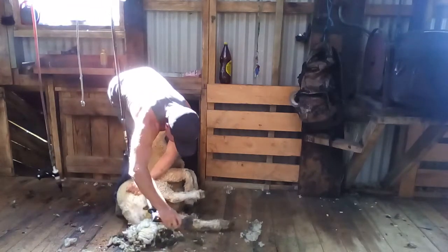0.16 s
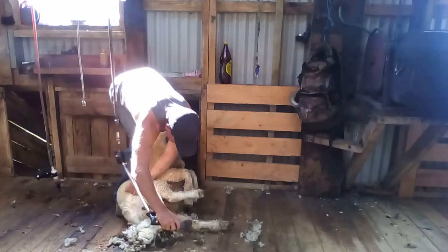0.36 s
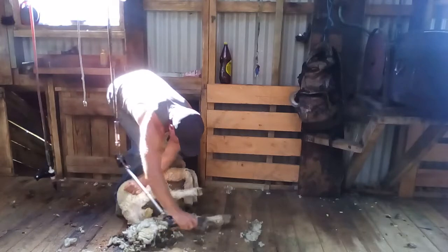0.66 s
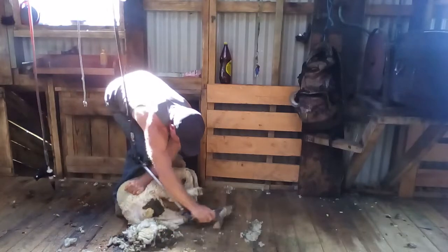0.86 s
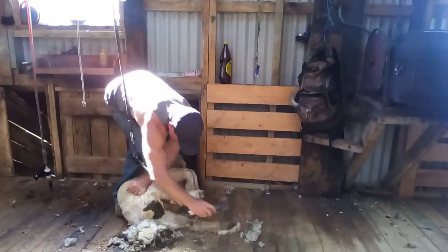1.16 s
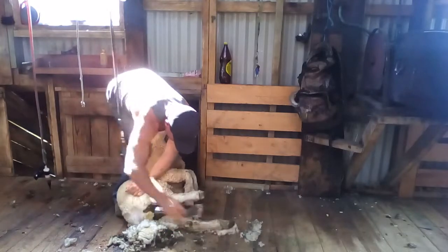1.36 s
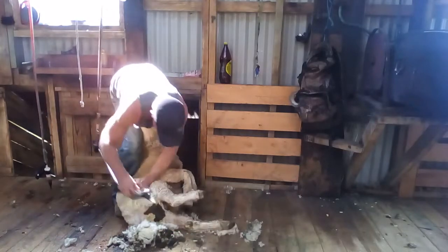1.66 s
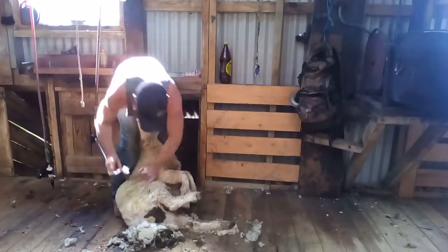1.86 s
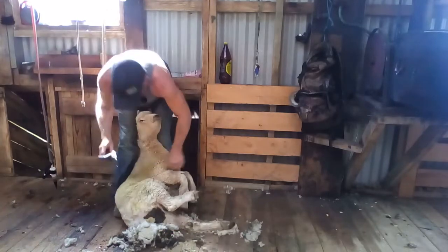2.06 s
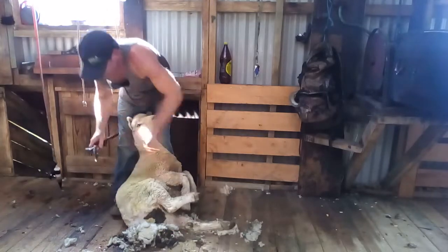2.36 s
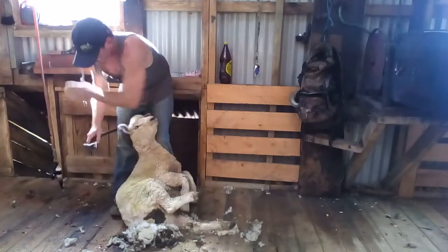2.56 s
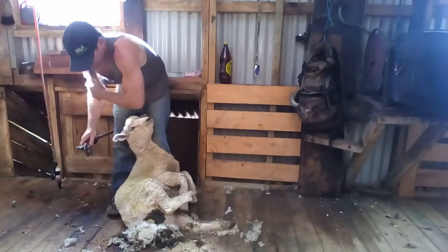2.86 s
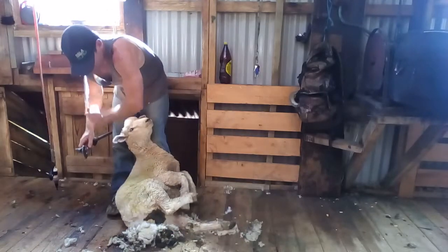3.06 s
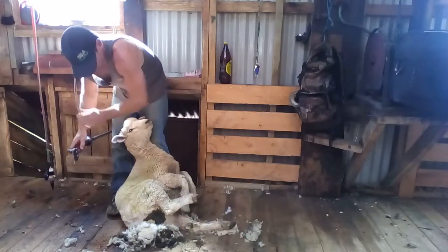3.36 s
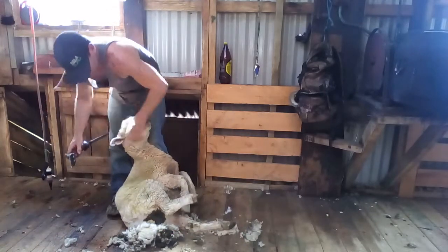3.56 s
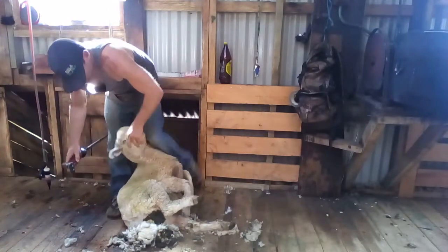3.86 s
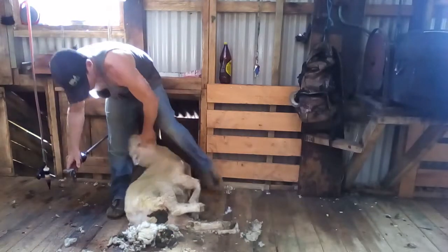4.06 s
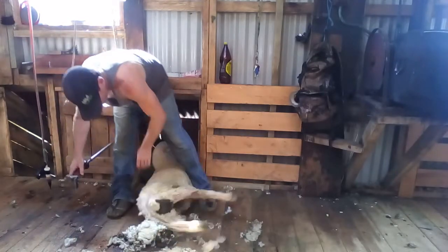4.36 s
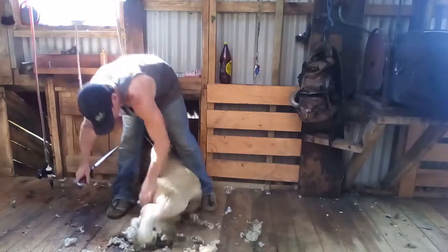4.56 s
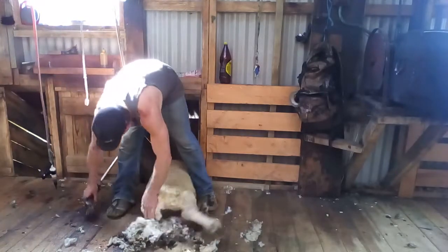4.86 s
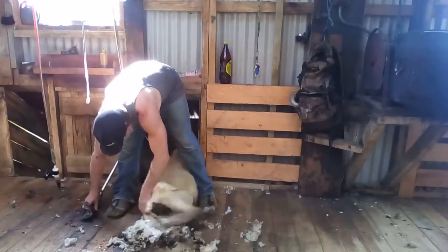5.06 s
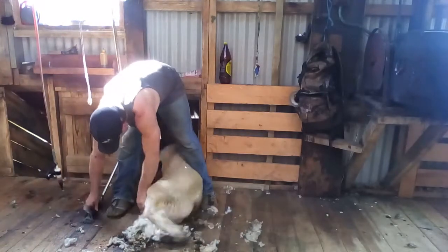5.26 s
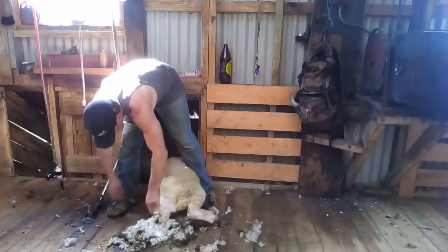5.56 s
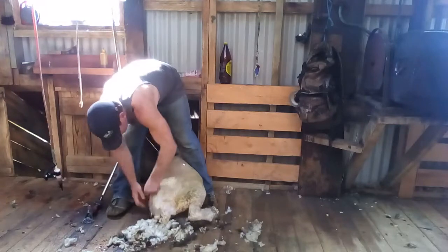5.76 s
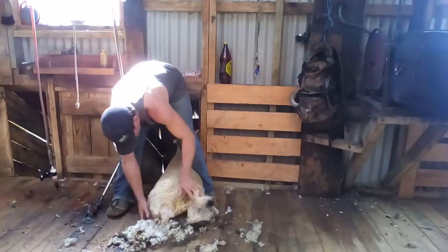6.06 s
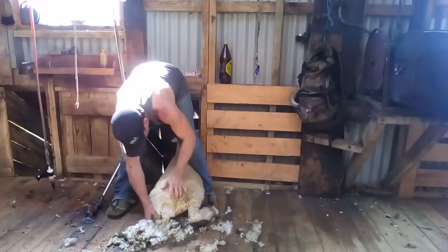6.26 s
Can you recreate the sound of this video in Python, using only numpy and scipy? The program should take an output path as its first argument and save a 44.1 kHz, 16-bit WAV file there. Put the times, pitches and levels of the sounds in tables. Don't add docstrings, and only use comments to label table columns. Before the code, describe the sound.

An electric shearing handpiece buzzes with a raspy metallic rattle, clacks off, is set down on boards, then hooves knock and scrabble on hollow wood.

```python
import sys
import numpy as np
from scipy import signal
from scipy.fft import rfft, irfft, next_fast_len
from scipy.io import wavfile
from scipy.ndimage import uniform_filter1d

SR = 44100
rng = np.random.default_rng(int(sys.argv[2]) if len(sys.argv) > 2 else 0)


def magnitude_from_level(level_db):
    exponent = np.asarray(level_db, float) / 20
    return 10 ** exponent


def log_audio(samples):
    frames = np.atleast_2d(samples).T
    limited = np.clip(frames, -1, 1)
    pcm = np.round(limited * 32767).astype(np.int16)
    wavfile.write(sys.argv[1], SR, pcm)


N = 282681
SECONDS = np.arange(N) / SR
STOP_S = 3.158


def rms_one(x):
    return x / np.sqrt(np.mean(x ** 2) + 1e-20)


def in_time(rows):
    s, *columns = np.transpose(rows)
    return [np.interp(SECONDS, s, c) for c in columns]


def at_hz(points, hz):
    table_hz, values = np.transpose(points)
    return np.interp(np.log(hz), np.log(np.maximum(table_hz, 1)), values)


def high_pass(x, order, hz):
    return signal.sosfilt(signal.butter(order, hz, "high", fs=SR, output="sos"), x)


def band_pass(x, order, low_hz, high_hz):
    return signal.sosfilt(signal.butter(order, [low_hz, high_hz], "band", fs=SR, output="sos"), x)


def drift(rate):
    r = np.exp(-80 * np.pi * rate / SR)
    noise = rng.standard_normal(N // 40 + 2002)
    slow = signal.lfilter([1], [1, -2 * r, r * r], noise)[2000:]
    return np.interp(np.arange(N) / 40, np.arange(len(slow)), rms_one(slow - slow.mean()))


def ring(x, hz, t60):
    r, w = magnitude_from_level(-60 / (t60 * SR)), 2 * np.pi * hz / SR
    return signal.lfilter([0, np.sin(w)], [1, -2 * r * np.cos(w), r * r], x + 1e-18)


# f/Hz, left-right correlation
LIKENESS = [(60, 0.93), (130, 0.99), (290, 0.85), (640, 0.53), (1410, 0.16), (3100, 0.079), (6820, 0.15),
            (15000, 0.0075)]
# f/Hz, left minus right level/dB
LEAN = [(60, 2.5), (110, 2.5), (200, 1.5), (380, -0.5), (700, -1.5), (1290, -0.5), (2380, 5), (4400, 3),
        (8120, -9.5), (15000, 5.5)]
EDGES = 25 * 2 ** np.arange(0, 9.5, .4)


def bands(size):
    white = rng.standard_normal((2, 2, size))
    for k, (low, high) in enumerate(zip(EDGES, EDGES[1:])):
        mid, side = band_pass(white[k % 2], 2, low, high)
        hz = np.sqrt(low * high)
        alike = np.clip(at_hz(LIKENESS, hz), -1, 1)
        lean = at_hz(LEAN, hz) / 2
        pair = np.sqrt(1 + alike) * mid + np.sqrt(1 - alike) * side * [[1], [-1]]
        yield hz, magnitude_from_level(np.array([[lean], [-lean]])) * pair


def coloured(spectrum, patchy_db, span=(0, 7)):
    start, stop = round(span[0] * SR), min(round(span[1] * SR), N)
    flat = sum(magnitude_from_level(patchy_db * drift(9.9)[start:stop]) * band for hz, band in bands(stop - start))
    size = next_fast_len(stop - start)
    hz = np.arange(size // 2 + 1) * SR / size + 1
    shaped = irfft(rfft(flat, size) * magnitude_from_level(at_hz(spectrum, hz)), size)
    out = np.zeros((2, N))
    out[:, start:stop] = rms_one(shaped[:, :stop - start])
    return out


# t/s, seventh order f/Hz, level/dB
DRIVE = [(0.0, 429.4, -17.5), (0.05, 423.9, -18), (0.38, 422.2, -19.5), (0.63, 420.0, -17),
         (1.58, 421.9, -19), (2.05, 422.6, -13), (2.21, 424.7, -22.5), (2.6, 423.4, -20.5),
         (2.74, 423.5, -23.5), (3.12, 422.5, -21)]
# multiple of its speed, level/dB
SHAFT = [(1, -23.5), (2, -15.5), (3, -15), (4, -7), (5, -16.5), (6, -16), (7, 0), (8, -10.5), (9, -22.5),
         (10, -16.5), (11, -14.5), (13, -21), (14, -21), (15, -24.5)]
# t/s, fourth order level/dB
BITE = [(0.0, -24), (0.29, -30.5), (0.42, -32), (0.7, -23.5), (1.55, -28), (2.02, -24), (2.34, -33.5),
        (2.53, -27), (3.12, -33)]
# order, t/s, width/s, level/dB
GRIP = [(2, 0.18, 0.21, 5), (2, 1.54, 0.29, 5), (2, 2.75, 0.36, 5.5), (1, 0.45, 0.27, 11.5),
        (1, 1.78, 0.43, 10.5), (9, 2.45, 0.19, 11), (9, 2.92, 0.27, 12), (10, 1.15, 0.57, 3.5),
        (10, 1.75, 0.23, 6.5), (11, 0.28, 0.25, 5.5), (11, 1.39, 0.22, 3), (14, 0.28, .3, 4.5),
        (14, 2.91, 0.19, 11.5), (15, 0.87, 0.18, 12.5), (15, 2.55, 0.22, 8), (13, 2.5, 0.3, -4),
        (3, 0.446, 0.17, 2.5), (3, 2.53, 0.47, 4)]
# t/s, level/dB
PRESSURE = [(0.0, -28.5), (0.28, -33), (0.99, -30.5), (1.54, -33), (1.66, -29), (1.67, -31.5), (1.89, -32),
            (1.95, -30), (3.14, -31.5)]
# f/Hz, level/dB per Hz
RATTLE = [(30, -8.5), (60, -19), (190, -12.5), (420, -17.5), (560, -16), (1100, -18.5), (2000, -19.5),
          (3000, -17), (3800, -20), (6300, -19), (8000, -32), (12200, -37.5), (13000, -30.5), (15200, -32)]
# f/Hz, bandwidth/Hz, level/dB
COMB = [(4570, 136, -3.5), (4950, 315, 3.5), (5910, 140, -9)]
BITE_SHARE = {2: -0.38, 9: -0.22}


def handpiece():
    seventh_hz, load_db = in_time(DRIVE)
    fourth_db, = in_time(BITE)
    press_db, = in_time(PRESSURE)
    swing_db = load_db - np.mean(np.transpose(DRIVE)[2])
    bite_db = fourth_db - np.mean(np.transpose(BITE)[1])
    press_db = press_db - np.mean(np.transpose(PRESSURE)[1])

    free_s = np.maximum(SECONDS - 2.752, 0)
    throb = 1 - np.sin(np.pi * 8.59 * free_s) ** 2
    seventh_db = load_db + 19.5 * np.minimum(free_s, .5) + 20 * np.log10(throb + 0.00084)

    turn = 2 * np.pi * np.cumsum(seventh_hz / 7) / SR
    running = 1 / (1 + np.exp(np.clip((SECONDS - STOP_S) / 0.0077, -50, 50)))
    hum = np.zeros(N)
    for order, level_db in SHAFT:
        own_db = {7: seventh_db, 4: fourth_db + 1.5}.get(order, level_db - 21 + 1.2 * drift(2.2))
        for which, s, width, db in GRIP:
            if which == order:
                own_db = own_db + db * np.exp(-((SECONDS - s) / width) ** 4)
        own_db = own_db + bite_db * BITE_SHARE.get(order, 0)
        shake = magnitude_from_level(0.23 * min(order, 8.0) * drift(31))
        phase = order * turn + rng.uniform(0, 3.6) + 0.03 * order * drift(12.7)
        hum += np.sqrt(2) * magnitude_from_level(own_db) * shake * np.sin(phase)

    sharp = np.clip(.4 + .2 * drift(4.0), 0, 1)
    sweep = np.exp(1.9 * sharp * (np.cos(2 * turn) + 0.6 * np.cos(turn + 1.9)))
    struck = rng.random((2, N)) < 1500 * sweep / SR
    strength = magnitude_from_level(4.0 * np.minimum(rng.exponential(1, (2, N)), 4))
    clicks = struck * strength * rng.choice([-1, 1], (2, N))
    steel = sum(magnitude_from_level(db) * ring(clicks, hz, 2.4 / width) for hz, width, db in COMB)
    steel = rms_one(band_pass(steel, 4, 3600, 7000))
    comb_db = -26.5 + 1.5 * press_db + .3 * drift(5.0)

    rattle = magnitude_from_level(-21.5 - 0.15 * swing_db) * coloured(RATTLE, patchy_db=1.02, span=(0, 4.3))
    rattle = rattle + magnitude_from_level(comb_db) * steel
    coasting = np.minimum(1, magnitude_from_level(-70 * (SECONDS - STOP_S)))
    return hum * running, rattle * (.55 * coasting + .45 * running)


# f/Hz, level/dB per Hz
HUSH = [(30, -31), (56, -1.5), (127, -9.5), (220, -5.5), (460, -13.5), (585, -7), (730, -14), (1170, -17.5),
        (3300, -20.5), (3800, -24.5), (6500, -25), (7900, -54), (11500, -49), (15000, -62)]


def hush():
    fan_db = -55 + 13 * np.maximum(SECONDS - 5.66, 0)
    fan = rms_one(ring(rng.standard_normal(N), 581, t60=0.38))
    air = coloured(HUSH, patchy_db=0.85)
    side_on = high_pass(np.roll(air[0], 16) - .5 * air[1], 1, 700)
    air = np.stack([air[0], air[1] + .33 * side_on])
    return magnitude_from_level(-39) * air + magnitude_from_level(fan_db) * fan


# f/Hz, T60/s
SHED_T60 = [(60, 1), (250, 0.93), (800, 0.62), (2000, 0.58), (5000, 0.78), (12000, 0.35)]
# f/Hz, level/dB per Hz
SHED_COLOUR = [(60, 3.5), (400, -3.5), (1300, 2.8), (2300, 1.5), (3700, 3.5), (5000, 3.5), (7500, -12),
               (12000, -12)]


def shed(x, early_s=.009):
    age = np.arange(SR) / SR
    echo = sum(magnitude_from_level(at_hz(SHED_COLOUR, hz) - 60 * age / at_hz(SHED_T60, hz)) * band for hz, band in bands(SR))
    echo = echo * (1 - np.exp(-(age / early_s) ** 2))
    return signal.fftconvolve(x[None], echo / np.sqrt(np.sum(echo ** 2) / 2), axes=1)[:, :N]


# f/Hz, T60/s, t/s, width/s, level/dB
BARREL = [
    (2820, 0.0024, 1.28, 0.38, -31),
    (1510, 0.0093, 1.23, 0.26, -35.5),
    (2400, 0.005, 2.5, 0.28, -40),
    (6030, 0.0085, 0.64, 0.096, -27),
    (6020, 0.0031, 1.28, 0.22, -31.5),
]


def barrel():
    out = np.zeros((2, N))
    for hz, t60, s, width, db in BARREL:
        facing = np.exp(-((SECONDS - s) / width) ** 4) * (SECONDS < STOP_S)
        rung = ring(ring(rng.standard_normal((2, N)), hz, t60), hz, t60)
        out += magnitude_from_level(db) * facing * rms_one(rung)
    return out


# t/s, length/s, level/dB
SHADED = [
    (1.47, 0.36, -8),
    (2.474, 0.12, -3.5),
    (2.77, 0.082, -2.5),
    (3.054, 0.53, -10),
]


def shaded(x):
    shade_db = 0
    for s, length, db in SHADED:
        inside_s = np.minimum(SECONDS - s, s + length - SECONDS)
        shade_db = shade_db + db * np.clip(inside_s / .03 + .5, 0, 1)
    top = signal.sosfiltfilt(signal.butter(2, 11600, "high", fs=SR, output="sos"), x)
    return x - (1 - magnitude_from_level(shade_db)) * top


# t/s, peak level/dB, f/Hz, T60/s
SQUEAKS = [
    (1.864, -23, 13200, .065),
    (5.352, -61, 13200, .2),
]


def squeaks():
    out = np.zeros((2, N))
    for s, db, hz, t60 in SQUEAKS:
        rasp = ring(ring(rng.standard_normal((2, N)), hz, t60=0.0092), hz, t60=.003)
        fade = magnitude_from_level(db - 60 * np.maximum(SECONDS - s, 0) / t60) * (SECONDS > s)
        out += fade * rms_one(rasp)
    return out


def blows(events, modes):
    give_cycles, far_cycles = 2.5, 8
    age = np.arange(12000) / SR
    contact_s = np.clip(np.transpose(events)[2], 2e-4, 1)[:, None]
    chatter = rng.standard_normal((len(events), len(age)))
    chatter = chatter * np.exp(-(age / contact_s) ** 4) * np.minimum(1, .1 + 2.5 * age / contact_s)
    chatter[:, 0] = 5
    out = np.zeros((2, N))
    for hz, level_db, t60 in modes:
        soft = ring(np.vstack([chatter, age == 0]), hz, give_cycles / hz)
        rung = ring(soft[:-1], hz, t60)
        rung = rung / np.max(np.abs(rung), axis=1, keepdims=True)
        clean = rms_one(ring(soft[-1], hz, min(t60, far_cycles / hz)))
        octaves = np.log2(hz / modes[2][0])
        for row, (s, peak_db, _, hard_db) in enumerate(events):
            both = np.stack([rung[row], clean * np.std(rung[row])])
            out[:, round(s * SR):][:, :len(age)] += magnitude_from_level(peak_db + level_db + hard_db * octaves) * both
    return out


# t/s, peak level/dB, contact/s, hardness/dB per octave
CLUTCH = [
    (3.1655, -6, 0.0048, -0.5),
    (3.175, -28, 0.0058, 1),
    (3.193, -17, 0.0011, -1),
]
# f/Hz, level/dB, T60/s
LEVER = [(294, -26, 0.024), (544, -32, 0.082), (712, -20, 0.1), (840, -0.5, 0.057), (1063, -2.5, 0.024),
         (1290, -0.5, 0.015), (1594, 3, 0.019), (1980, -4, .015), (2330, -10.5, 0.071), (2840, -32, 0.015),
         (4160, -12, .015), (5900, -9.5, 0.0098)]


def clutch():
    return blows(CLUTCH, LEVER)


# t/s, peak level/dB, low f/Hz, high f/Hz
TICKS = [(3.1665, -20, 1200, 7000), (3.466, -44, 3000, 11000), (3.4885, -27, 1500, 7000),
         (4.7035, -26, 1800, 6500), (4.716, -31, 1500, 3000), (4.8505, -16.5, 1000, 2100),
         (5.2975, -42, 1500, 6000), (5.3012, -31, 4800, 12000), (5.306, -26, 1000, 2000),
         (5.317, -52, 7500, 11000), (5.394, -21.5, 450, 900), (5.576, -27, 1000, 1800),
         (5.686, -31, 900, 2000)]


def ticks():
    out = np.zeros(N)
    for s, db, low_hz, high_hz in TICKS:
        click = band_pass(np.arange(800) == 0, 2, low_hz, high_hz)
        out[round(s * SR):][:len(click)] += magnitude_from_level(db) * click / np.max(np.abs(click))
    return out


# t/s, peak level/dB, contact/s, hardness/dB per octave
LAID = [
    (3.462, -53, 0.0082, 12.5),
    (3.487, -10, 0.012, 1.5),
    (3.513, -30, 0.0045, 0),
]
# f/Hz, level/dB, T60/s
TOOL = [(253, -33, .03), (493, -38, .025), (756, -32, .03), (908, 1, 0.046), (1157, -1.5, 0.036),
        (1416, -4.5, 0.018), (1724, -2.5, 0.037), (2150, -13.5, 0.013), (3380, -19.5, 0.011),
        (4190, -16, 0.014), (5300, -22.5, .005), (5760, -14.5, .01), (6050, -24, 0.0044), (9900, -24, .003)]


def tool_laid_down():
    return blows(LAID, TOOL)


# t/s, length/s, level/dB
SCUFF = [
    (4.656, 0.04, -35),
    (5.33, 0.036, -27),
    (5.418, 0.033, -22.5),
    (5.453, 0.083, -23.5),
    (5.533, 0.043, -28),
    (5.67, .01, -39),
]
# f/Hz, level/dB per Hz
SCUFF_COLOUR = [(41, -23), (70, -9.5), (332, -3), (387, -10), (466, -12.5), (788, -13.5), (982, -15),
                (2210, -33.5), (3050, -32.5), (4000, -48), (5200, -71), (8800, -120)]


def scuffing():
    slides = []
    for s, length, db in SCUFF:
        before_s = np.maximum(s - SECONDS, 0)
        after_s = np.maximum(SECONDS - s - length, 0)
        slides.append(db - 496 * before_s - 320 * after_s)
    level_db = np.max(slides, axis=0) - 3 + 2.5 * drift(40)
    return magnitude_from_level(level_db) * coloured(SCUFF_COLOUR, patchy_db=3.0, span=(4.4, 6))


# t/s, peak level/dB, contact/s, hardness/dB per octave
KNOCKS = [(4.657, -34.5, 0.03, 5), (4.7028, -9.5, 0.005, 2), (4.713, -18.5, 0.0051, 3.5),
          (4.8495, -13, 0.0036, 4.5), (4.856, -16, 0.0092, -6.5), (4.878, -15, 0.0041, -6),
          (4.796, -20.5, 0.0051, -7), (5.089, -47, 0.0051, -11), (5.418, -33.5, .03, 2),
          (5.47, -28, .03, 0.5), (5.515, -30, 0.0072, 0), (5.655, -34, .004, -1)]
# f/Hz, level/dB, T60/s
BOARDS = [(257, -14, 0.059), (460, -2.5, 0.008), (607, 1.5, 0.017), (858, -17, .015), (1073, -5.5, 0.018),
          (1353, -4.5, 0.012), (1636, -9, 0.015), (2100, -19, .006), (2480, -21, 0.0064),
          (3250, -37, 0.0028), (4450, -41, .003)]


def knocks():
    return blows(KNOCKS, BOARDS)


# t/s, peak level/dB, contact/s, hardness/dB per octave
THUDS = [
    (4.713, -6, 0.0057, 2.5),
    (4.748, -14, 0.0045, 4),
    (5.02, -31.5, 0.023, -5),
    (4.852, -12.5, 0.017, 11),
    (5.305, -15.5, 0.018, 11),
    (5.51, -24, 0.018, -2),
    (5.55, -23, 0.023, -5),
]
# f/Hz, level/dB, T60/s
JOISTS = [(89, -7.5, 0.12), (135.3, -5, 0.26), (192.7, -14, 0.27), (263, -13, 0.21)]


def thuds():
    return blows(THUDS, JOISTS)


# t/s, peak level/dB, contact/s, hardness/dB per octave
HOOVES = [(5.341, -12.5, 0.0007, 1.5), (5.37, -19.5, 0.012, -8), (5.3925, -11.5, 0.00074, 4),
          (5.402, -15.5, 0.0071, -3), (5.42, -11.5, 0.015, 6), (5.443, -24, 0.0044, 9),
          (5.462, -20, 0.014, 2), (5.49, -28, 0.0074, 5), (5.506, -21, 0.013, -7), (5.546, -25, 0.015, -2)]
# f/Hz, level/dB, T60/s
HOLLOW = [(197, -31, 0.044), (320, -0.5, 0.023), (424, -1.5, 0.021), (610, -30, .02), (1000, -31, .015),
          (1500, -30.5, 0.019)]


def hooves():
    return blows(HOOVES, HOLLOW)


WET_DB = [-1, -1.5, -7, -8, -8.5]


def scene():
    hum, rattle = handpiece()
    struck = [clutch(), tool_laid_down(), knocks(), hooves(), thuds()]
    edges = ticks()
    far = magnitude_from_level(-9.5) * edges + sum(magnitude_from_level(db) * body[1] for db, body in zip(WET_DB, struck))
    wet = shed(magnitude_from_level(-15) * hum + high_pass(far, 3, 98))
    near = high_pass(sum(body[0] for body in struck), 3, 68)
    return hum + edges + near + wet + shaded(rattle) + squeaks() + scuffing() + hush() + barrel()


def low_pass(x):
    return signal.sosfilt(signal.butter(12, 15400, fs=SR, output="sos"), x)


def record(dry):
    x = np.stack([dry[0], np.roll(dry[1], 2)])
    x = np.tanh(high_pass(x, 2, 45) / 1.308) * 1.065
    to_sum_and_difference = np.array([[1, 1.0], [1, -0.98]]) / np.sqrt(2)
    hz, _, cells = signal.stft(to_sum_and_difference @ x, SR, nperseg=1536)
    size = np.abs(cells)
    around = uniform_filter1d(uniform_filter1d(size, size=24, axis=1), size=7, axis=2)
    threshold_db = np.where(hz > 12700, 1.5, 3.8)[:, None]
    kept = (size > magnitude_from_level(threshold_db) * around) | (hz[:, None] < 7900)
    thinned = signal.istft(cells * kept, SR, nperseg=1536)[1][:, :N]
    return low_pass(to_sum_and_difference @ thinned)


dry = scene()
out = record(dry)
log_audio(out)
```